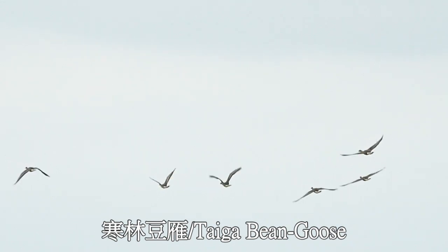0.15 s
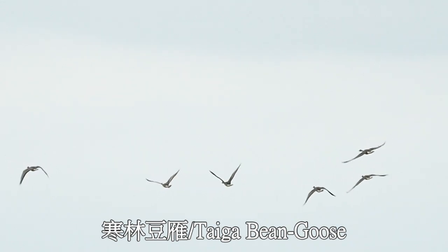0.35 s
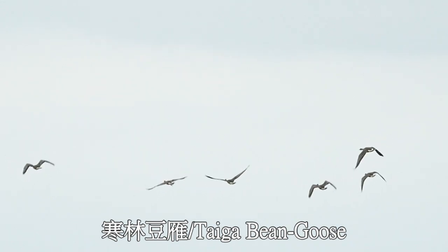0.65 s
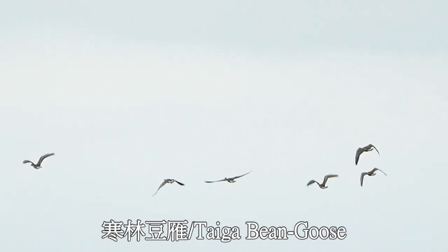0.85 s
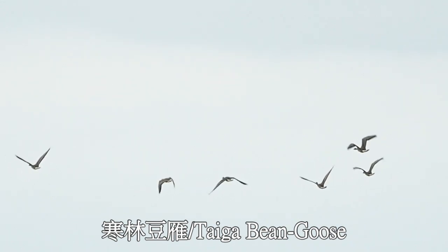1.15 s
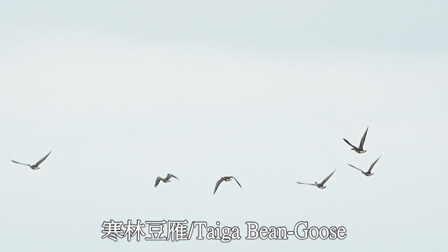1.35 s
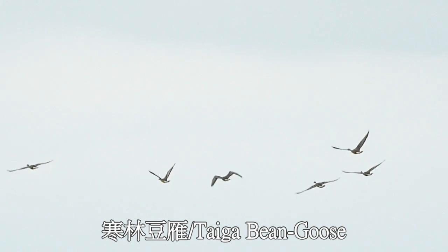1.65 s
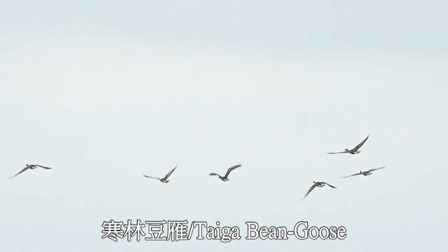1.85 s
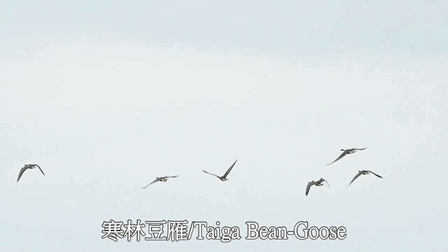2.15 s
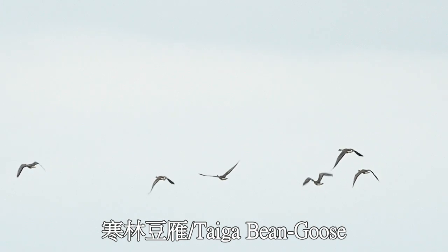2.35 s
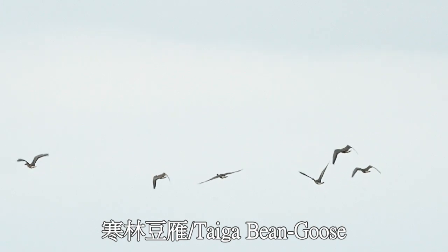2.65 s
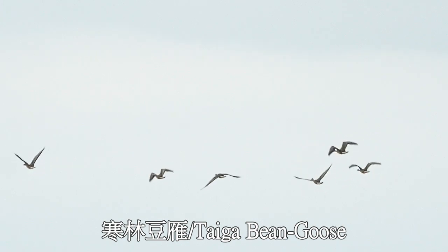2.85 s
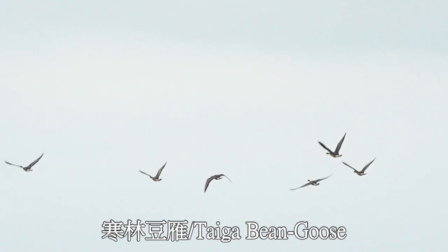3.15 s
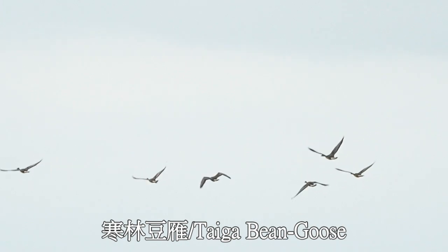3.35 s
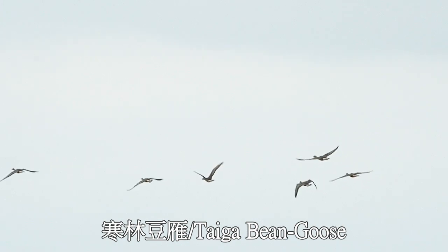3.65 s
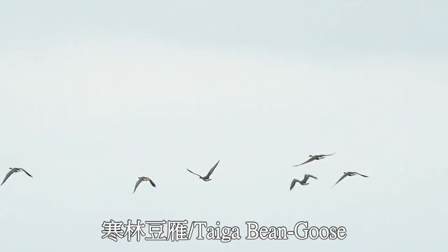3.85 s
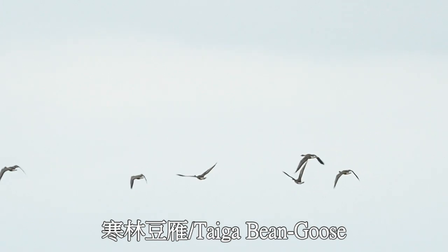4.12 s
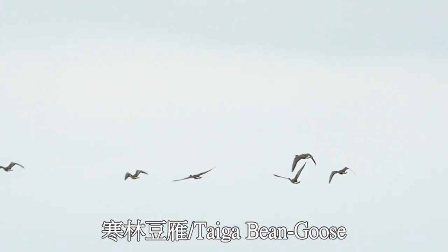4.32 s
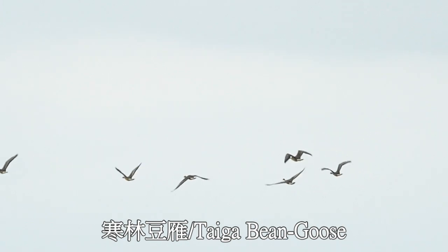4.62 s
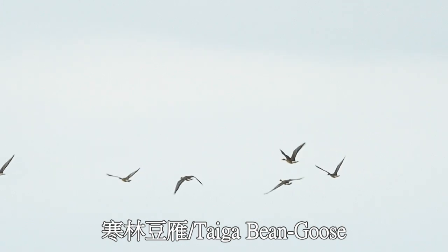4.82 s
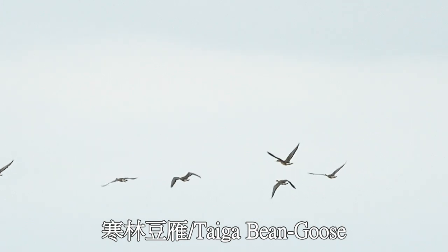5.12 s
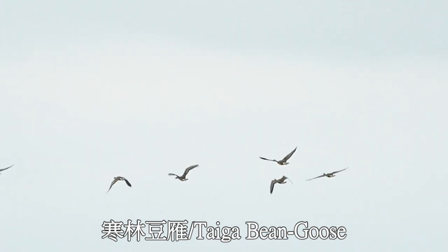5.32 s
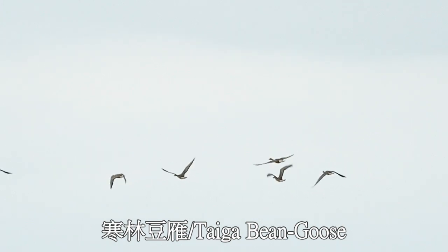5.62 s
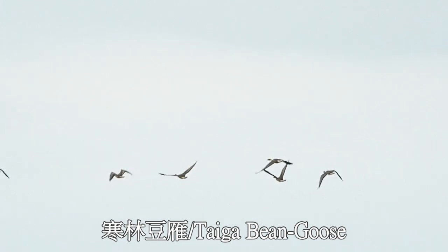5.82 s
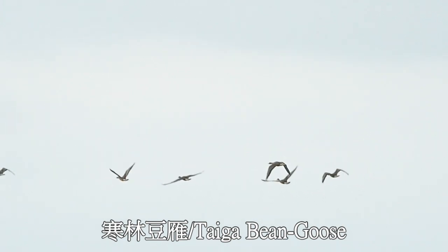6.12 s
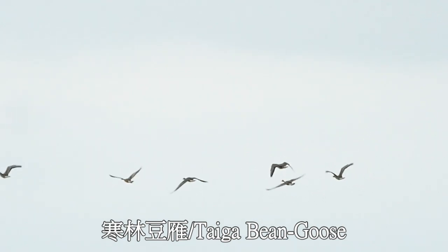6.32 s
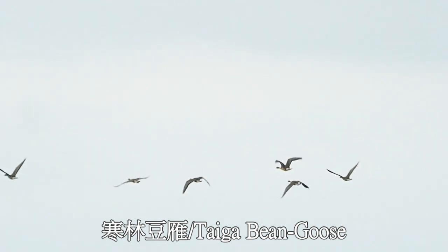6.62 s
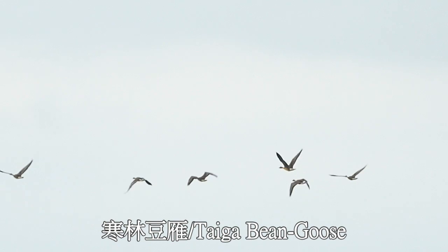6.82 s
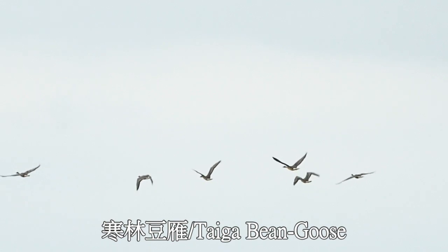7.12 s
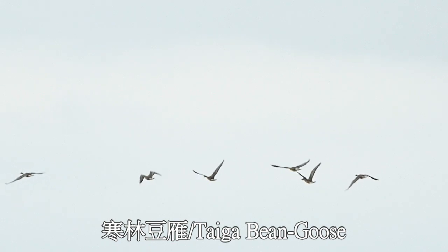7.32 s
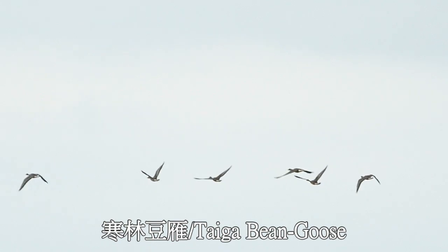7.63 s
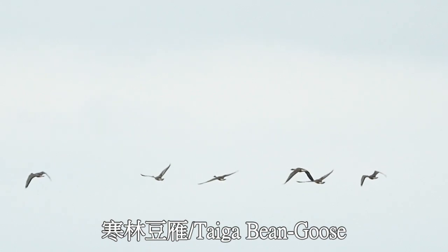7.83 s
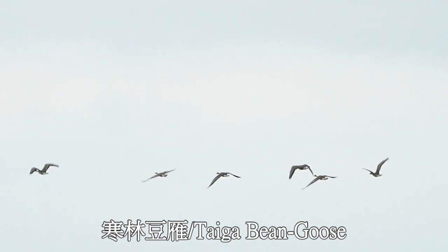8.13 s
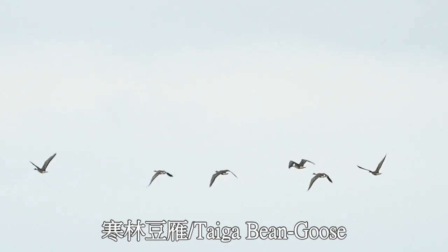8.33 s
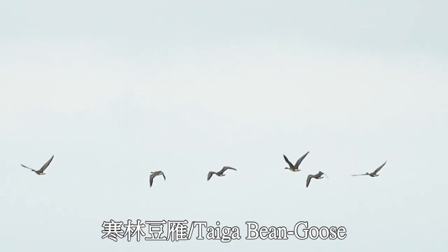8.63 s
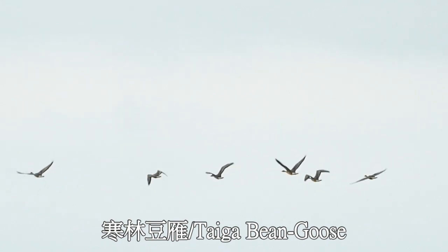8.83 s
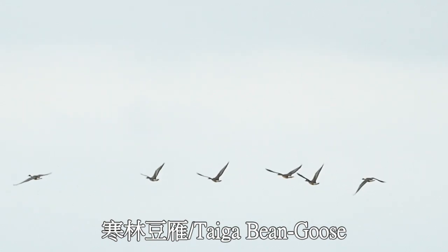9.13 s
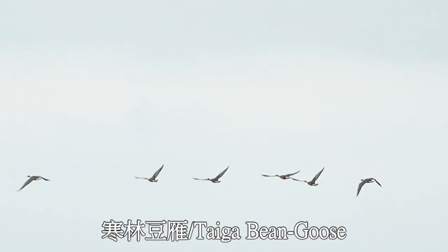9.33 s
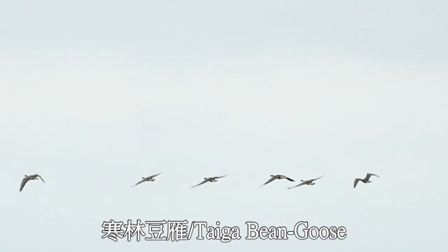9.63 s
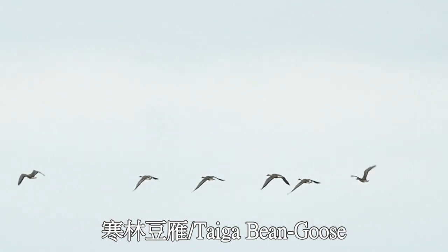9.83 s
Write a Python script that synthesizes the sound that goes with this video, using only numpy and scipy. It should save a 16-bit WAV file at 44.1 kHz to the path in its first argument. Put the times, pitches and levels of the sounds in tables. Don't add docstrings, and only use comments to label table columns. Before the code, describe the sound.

Outdoors, two flying geese trade short nasal honks, high and low, while flight feathers snap in quick rattles above a soft distant rumble.

```python
import sys
import numpy as np
from scipy import signal
from scipy.fft import rfft, irfft
from scipy.io import wavfile
from scipy.ndimage import uniform_filter1d

SR = 44100
rng = np.random.default_rng(int(sys.argv[2]) if len(sys.argv) > 2 else 0)


def voltage_ratio(decibels):
    exponent = np.asarray(decibels, float) / 20
    return 10 ** exponent


def waveform_to_disk(signal):
    frames = np.transpose(np.atleast_2d(signal))
    scaled = np.clip(frames, -1, 1) * 32767
    samples = np.round(scaled).astype(np.int16)
    wavfile.write(sys.argv[1], SR, samples)


N = 439677


def high_goose(out):
    # start in seconds, tone length in s, croak tail in s, top of the tone in Hz, top level in dB.
    calls = [(0.133, .13, 0.079, 972, -9), (0.717, 0.064, 0.039, 966, -10),
             (1.254, 0.062, .064, 953.6, -10), (1.942, 0.13, 0.074, 952, -12),
             (2.505, 0.064, 0.054, 956, -17), (3.157, 0.11, 0.084, 957.5, -21.5),
             (3.753, 0.1, 0.077, 951, -22), (4.515, 0.11, 0.096, 980, -15), (5.333, 0.066, 0.12, 983, -14),
             (6.374, 0.051, 0.091, 965, -12), (6.968, 0.063, 0.071, 1005, -25),
             (7.59, 0.053, 0.15, 1002, -20), (8.402, 0.077, .071, 1025, -30.5),
             (9.651, 0.061, 0.052, 1000, -26)]
    # loss of lows in dB per octave, treble lean to the left in dB, hoarseness from -1 to 1.
    headings = [(1.5, 0.1, 0.00013), (0, -0.7, -0.043), (0.1, -3.7, .1), (0.4, -0.2, .1),
                (-3.6, 1.2, -0.051), (-5, 1.3, 0.15), (-5, -22, 0.16), (0, -0.3, .1), (1, 0.3, -0.33),
                (4.5, -3, 0.35), (-0.2, -4, -.1), (12, -1.5, 0.21), (5, -1.5, .1), (5, -1, 0.19)]
    # how far the tone sags under its top in percent,
    # tone level against the top in dB, pulse rate in Hz, croak level against the top in dB.
    shape = [
        (4, -18, 190, -7.5),
        (0.5, -3, 185, -10),
        (0, 1.5, 180, -25),
        (3, -7.5, 220, -12.5),
        (9.5, -13, 220, -19.5),
        (12, -19.5, 178, -15.5),
        (15, -29.5, 100, -18.5),
    ]
    # level in dB, lower side line in dB, upper side line in dB.
    partials = [(-5, -15, -6.5), (4.5, -11.5, -4.5), (-1.5, -7.5, -7), (-8, -0.5, 1), (-17.5, 3, 3),
                (-24, 5, 2), (-34, -6, 6.5), (-40, 4, 7)]
    # centre in Hz, width in Hz, level in dB.
    pipe = [(735, 700, 0), (1973, 230, 8), (2600, 540, 2), (3820, 860, -1.5), (5500, 1500, -15.5)]
    honks(out, calls, shape, headings, partials, pipe, break_s=.024, rough=.08, slack=0.38,
          breath_db=-37.5, hiss_db=-24.0)


def low_goose(out):
    # start in seconds, tone length in s, croak tail in s, top of the tone in Hz, top level in dB.
    calls = [(-0.13, 0.12, 0.1, 602, -15), (0.716, 0.14, 0.12, 601.4, -18), (1.596, 0.12, 0.11, 600, -19),
             (2.722, .132, .233, 606.3, -14.5), (3.62, .102, 0.1, 597, -13.5), (4.219, .09, 0.12, 600, -15),
             (4.968, .128, .08, 605, -11.5), (5.81, .12, .13, 597, -16), (6.592, .14, .078, 610.3, -11.5),
             (7.397, 0.094, 0.094, 605.6, -17.5), (8.198, .12, 0.07, 603.4, -23),
             (9.002, .097, .092, 612, -24.5), (9.749, 0.095, 0.099, 623, -17)]
    # loss of lows in dB per octave, treble lean to the left in dB, hoarseness from -1 to 1.
    headings = [(-2.4, -5.5, -0.37), (-3, 4, .4), (-3.2, -5, .1), (-1.36, -2.5, 0.11), (0.36, -3, 0.49),
                (0, -3, .2), (3, -2, 0.12), (0.85, -2, .2), (5, -3.5, -0.24), (5, -1.5, .1), (6, 0, -0.37),
                (8, -0.5, .9), (9, -1, -.1)]
    # how far the tone sags under its top in percent,
    # tone level against the top in dB, pulse rate in Hz, croak level against the top in dB.
    shape = [
        (6.5, -14.5, 165, -9),
        (1.3, -1.25, 163, -12),
        (0, 0.5, 165, -46.5),
        (1.65, -2.14, 165, -8),
        (4.5, -15, 152, -8.5),
        (12, -17, 140, -10),
        (16, -22, 92, -13),
    ]
    partials_db = [0.5, -6, 4.5, -4.5, -10.5, -3.5, -8.5, -18.5, -21, -28.5, -31.5]
    # centre in Hz, width in Hz, level in dB.
    pipe = [(550, 315, -2.5), (874.5, 98, 4), (1564, 436, 6), (2600, 2000, -1), (3826, 250, -3),
            (5000, 230, -17.5)]
    clear_partials = [(db, -45, -45) for db in partials_db]
    honks(out, calls, shape, headings, clear_partials, pipe, break_s=.008, rough=.16, slack=0.24,
          breath_db=-21, hiss_db=-25.5)


def honks(out, calls, shape, headings, partials, pipe, break_s, rough, slack, breath_db, hiss_db):
    for honk, (thin_db, lean_db, hoarse) in zip(calls, headings):
        lean_db = np.clip(lean_db, -6, 6)
        rows = stages(honk, shape, break_s, hoarse)
        start, (tone_hz, tone_db, pulse_hz, croak_db), gate = span(rows, release_s=0.0026)

        grip_db = 0.48 * np.clip(croak_db - tone_db + 5.5, -15, 15)
        hoarse_share = max(hoarse, 0) ** 2
        jitter = rms_one(uniform_filter1d(rng.standard_normal(len(gate)), size=40))
        flutter = 1 + (0.0099 + 0.03 * hoarse_share) * jitter
        fluttered_hz = uniform_filter1d(tone_hz, size=650) * flutter
        slack_db = slack * (tone_db.max() - tone_db)
        voice = tone(fluttered_hz, pulse_hz, partials, grip_db, slack_db)

        memory = signal.lfilter([.0015], [1, -.9985], voltage_ratio(tone_db))
        least_uneven = .06 + .04 * max(thin_db, 0) + .5 * hoarse_share
        uneven = rough * np.clip(memory / voltage_ratio(croak_db), least_uneven, 1)
        breath = voltage_ratio(breath_db) * croak(pulse_hz, pipe, 0, 30)
        sound = voltage_ratio(tone_db) * (voice + breath)
        sound = sound + voltage_ratio(croak_db) * croak(pulse_hz, pipe, uneven, .05 + .8 * uneven)
        sound = gate * sound

        hz = np.fft.rfftfreq(len(gate), 1 / SR)
        octaves_down = np.clip(np.log2(2800 / np.maximum(hz, 1)), 0, 2.2)
        sound = irfft(rfft(sound) * voltage_ratio(-thin_db * octaves_down), len(gate))
        add(out, start, sound, lean_db)
        bill_hiss(out, start, sound, lean_db, hiss_db)


def bill_hiss(out, start, sound, lean_db, hiss_db):
    band = signal.butter(3, [5500, 10000], "band", fs=SR, output="sos")
    hiss = signal.sosfilt(band, rng.standard_normal((2, len(sound))))
    hiss = hiss * voltage_ratio(hiss_db + rng.normal(0, 2.5))
    hiss = hiss * np.abs(sound) * voltage_ratio([[lean_db], [-lean_db]])
    at = round(start * SR)
    out[:, at:at + len(sound)] += hiss[:, :N - at]


def stages(honk, shape, break_s, hoarse):
    start, tone_s, tail_s, top_hz, top_db = honk
    set_in_s, crest_share, run_down_s = .028, .45, .03
    s = np.array([0, set_in_s, set_in_s + crest_share * (tone_s - set_in_s), tone_s,
                  tone_s + min(break_s, 0.33 * tail_s),
                  tone_s + tail_s - min(run_down_s, .4 * tail_s), tone_s + tail_s])
    sag, tone_db, pulse_hz, croak_db = np.transpose(shape)

    tail_fade_db = 190 * max(tail_s - .125, 0)
    tone_db = tone_db - tail_fade_db * np.array([0, 0, 0, 0, .6, 1, .3])

    croak_db = croak_db + np.clip(hoarse, -1, 1) * (-7 - croak_db) * (s > 0)
    tone_db = tone_db * (1 + .6 * np.clip(hoarse + .25, -1, 0) * (s >= tone_s))
    return np.transpose([start + s, top_hz * (1 - sag / 100), top_db + tone_db, pulse_hz, top_db + croak_db])


def span(rows, release_s):
    s, *columns = np.transpose(rows)
    start = max(s[0] - .005, 0)
    t = start + np.arange(round((s[-1] - start + .055) * SR)) / SR
    smooth = [uniform_filter1d(np.interp(t, s, column), size=300) for column in columns]
    gate = np.clip((t - start) / .005 + .25, 0, 1)
    gate = gate * np.exp(-np.maximum(t - s[-1], 0) / release_s)
    return start, smooth, gate


def tone(tone_hz, pulse_hz, partials, grip_db, slack_db):
    fast, slow = 2 * np.pi * np.cumsum([tone_hz, pulse_hz], axis=1) / SR
    lines, power = 0, 0
    for k, (db, lower_db, upper_db) in enumerate(partials, 1):
        line = k * fast + rng.uniform(0, .5) * k
        gain = voltage_ratio(db - slack_db * np.log2(k) + rng.normal(0, 1.5))
        lines = lines + gain * np.sin(line)
        power = power + gain ** 2 / 2
        if upper_db <= -40:
            continue
        for step in (1, 2):
            lower = gain * voltage_ratio(step * (lower_db + grip_db)) * np.sin(line - step * slow)
            upper = gain * voltage_ratio(step * (upper_db + grip_db)) * np.sin(line + step * slow)
            lines = lines + (-1) ** step * lower + upper
    return lines / np.sqrt(power)


def croak(pulse_hz, pipe, rough, rasp):
    wobble, sizes, air = rng.standard_normal((3, len(pulse_hz)))
    uneven_hz = pulse_hz * (1 + rough * rms_one(uniform_filter1d(wobble, size=300)))
    cycles = np.cumsum(uneven_hz) / SR
    new_cycle = np.diff(np.floor(cycles), prepend=-1) > 0
    slaps = new_cycle * voltage_ratio(14 * rough * np.clip(sizes, -3, 1.6))
    puffs = rasp * air * np.exp(-4.0 * (cycles % 1))
    waver_db = uniform_filter1d(rng.standard_normal((len(pipe), len(air))), size=900) * 85
    closing_db = np.linspace(0, 4.0, len(air))
    rung = 0
    for k, (hz, width, db) in enumerate(pipe):
        push = slaps + puffs * hz / 2000
        ring = resonate(resonate(push, hz, 3 * width), hz, width) / np.sqrt(width)
        ring_db = db + waver_db[k] - closing_db * np.log2(hz / 900)
        rung = rung + (-1) ** k * voltage_ratio(ring_db) * ring
    return rms_one(signal.lfilter(*signal.butter(2, 5500, fs=SR), rung))


def rms_one(x):
    return x / np.sqrt(np.mean(x ** 2) + 1e-20)


def resonate(x, hz, width_hz):
    r = np.exp(-np.pi * width_hz / SR)
    feedback = [1, -2 * r * np.cos(2 * np.pi * hz / SR), r * r]
    return signal.lfilter([(1 - r * r) / 2, 0, (r * r - 1) / 2], feedback, x)


def add(out, start_s, sound, lean_db):
    at = round(start_s * SR)
    sound = sound[:N - at]
    treble = sound - uniform_filter1d(sound, size=9)
    early = .07 * lean_db * np.gradient(treble) * [[1], [-1]]
    leaning = treble * (voltage_ratio([[lean_db], [-lean_db]]) - 1)
    out[:, at:at + len(sound)] += sound + leaning + early


def grunts(out):
    # start in seconds, length in s, level in dB, pulse rate in Hz.
    grunt_table = [
        (4.761, .058, -21.5, 179.5),
        (5.935, .068, -16.5, 188.3),
    ]
    # centre in Hz, width in Hz, level in dB.
    grunt_pipe = [(1223, 240, -5), (2130, 180, 1), (3190, 180, -8), (4500, 220, -20)]
    edge_s = 0.02
    for s, length, db, hz in grunt_table:
        slow_hz = hz * (1 - 0.03)
        rows = [(s, db - 1.5, slow_hz), (s + edge_s, db, hz),
                (s + length - edge_s, db, hz), (s + length, db - 13, slow_hz)]
        start, (grunt_db, pulse_hz), gate = span(rows, release_s=0.0046)
        add(out, start, gate * voltage_ratio(grunt_db) * croak(pulse_hz, grunt_pipe, .008, .03), -1)


def wing_snaps(out):
    # first snap in seconds, last snap in s, level in dB, ring in Hz.
    snap_runs = [(0.0774, 0.0995, -26.5, 5100), (0.3390, 0.3815, -19.5, 4500), (0.6002, 0.6465, -23, 5200),
                 (0.6650, 0.6650, -28.5, 2540), (0.8874, 0.9304, -17.5, 5200), (1.157, 1.2012, -31.5, 5200),
                 (1.4122, 1.4330, -32, 4900), (1.461, 1.4970, -26.5, 5340), (1.7145, 1.8010, -31, 5300),
                 (2.2204, 2.2625, -17, 4700), (2.3393, 2.3381, -31.5, 2220), (2.4616, 2.5012, -21, 4270),
                 (3.5743, 3.5955, -31.5, 3400), (3.84, 3.8620, -35, 4580), (4.0920, 4.1150, -46, 4500),
                 (4.6485, 4.6695, -23, 5000), (4.842, 4.9462, -20, 4900), (5.1089, 5.2150, -22, 4500),
                 (5.596, 5.6602, -24.5, 4800), (5.6723, 5.6957, -27.5, 2120), (6.0990, 6.1640, -30.5, 2600),
                 (6.8450, 6.8848, -31, 5300), (8.9742, 9.0055, -31, 4800), (9.2332, 9.2685, -36, 5340)]
    for first, last, top_db, ring_hz in snap_runs:
        gaps = round((last - first) / .0212)
        long_run = gaps >= 5
        for part in np.linspace(0, 1, gaps + 1):
            slowing = .27 * long_run * part * (1 - part)
            s = first + (last - first) * (part - slowing)
            arch_db = 9 * (gaps > 1) * (2 * part - 1) ** 2
            late_db = 6 * long_run * part ** 4
            db = top_db - arch_db - late_db + rng.normal(0, 1.0)
            snap(out, s, db, ring_hz * rng.uniform(.92, 1.08), 1 - .5 * s + rng.normal(0, 3))
            slip_s, slip_db = s - rng.uniform(.006, .011), db - rng.uniform(12, 22)
            snap(out, slip_s, slip_db, rng.uniform(2000, 8000), rng.normal(-2, 5))


def wing_rattles(out):
    # start in seconds, length in s, level in dB, ring in Hz.
    rattle_table = [
        (2.251, .09, -29.5, 2060),
        (3.993, .005, -47, 1390),
        (7.809, .09, -42.5, 3600),
        (8.024, .12, -47, 3070),
        (8.764, .09, -43.5, 3100),
        (9.452, .11, -43, 2220),
        (9.946, .03, -45, 2980),
    ]
    for start, length, top_db, hz in rattle_table:
        for k, s in enumerate(np.arange(start, start + length, .0103)):
            weak = k % 2
            at_s = s + weak * rng.normal(0, .002)
            db = top_db - 2 - 8 * weak + rng.normal(0, 2)
            snap(out, at_s, db, hz * rng.uniform(.8, 1.5), rng.normal(-2, 3))


def snap(out, s, db, hz, lean_db):
    tick = rng.standard_normal(300) * np.exp(-np.arange(300) / 14) * .25
    tick[0] = 1
    body = 1.4 * resonate(resonate(tick, hz, .6 * hz), hz, .45 * hz)
    body = body + .1 * resonate(tick, 8500, 4000) + .2 * resonate(tick, 2600, 1500)
    body = uniform_filter1d(uniform_filter1d(body, size=4), size=3)
    add(out, s - .0003, voltage_ratio(db + 8.0) * body / np.abs(body).max(), lean_db)


def background():
    # frequency in Hz, level in dB per Hz.
    air_colour = [(15, -35), (25, 6), (658, -8), (1040, -12.5), (2110, -15.5), (2900, -21.5), (6000, -31.5),
                  (16000, -48)]
    # time in seconds, rumble level in dB, hiss level in dB.
    background_levels = [
        (0, -60, -46.5),
        (5, -54.5, -51),
        (7, -48, -53),
        (8.6, -56, -58),
    ]
    length = N + 1323
    hz = np.maximum(np.fft.rfftfreq(length, 1 / SR), 1)
    colour_hz, colour_db = np.transpose(air_colour)
    colour = voltage_ratio(np.interp(np.log(hz), np.log(colour_hz), colour_db))
    colour = colour * (1 + 1.1 / (1 + ((hz - 92) / 10) ** 2))
    mid, side = rfft(rng.standard_normal((2, length))) * colour
    side = side * np.clip(0.17 + (hz / 5000) ** 2, 0, 1)
    left_right = np.array([mid + side, mid - side])

    low = 1 / (1 + (hz / 400) ** 2)
    rumble = rms_one(irfft(left_right * low)[:, :N])
    hiss = rms_one(irfft(left_right * (1 - low))[:, :N])
    s, rumble_db, hiss_db = np.transpose(background_levels)
    t = np.arange(N) / SR
    return rumble * voltage_ratio(np.interp(t, s, rumble_db)) + hiss * voltage_ratio(np.interp(t, s, hiss_db) + 1.0)


def scene():
    flock = np.zeros((2, N))
    high_goose(flock)
    low_goose(flock)
    grunts(flock)
    wing_snaps(flock)
    wing_rattles(flock)
    flock = signal.sosfilt(signal.butter(2, 9000, fs=SR, output="sos"), flock)
    return flock + background()


def top_cut(x):
    return signal.sosfilt(signal.butter(12, 16140, fs=SR, output="sos"), x)


def record(dry):
    mix = np.tanh(dry / 0.97)
    return top_cut(mix)


dry = scene()
out = record(dry)
waveform_to_disk(out)
```